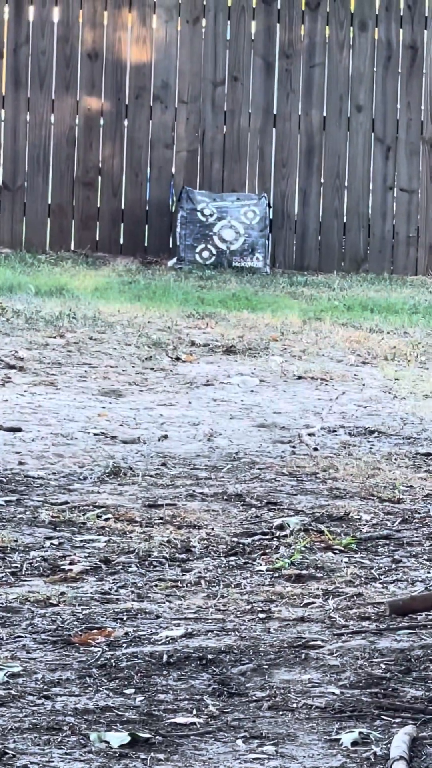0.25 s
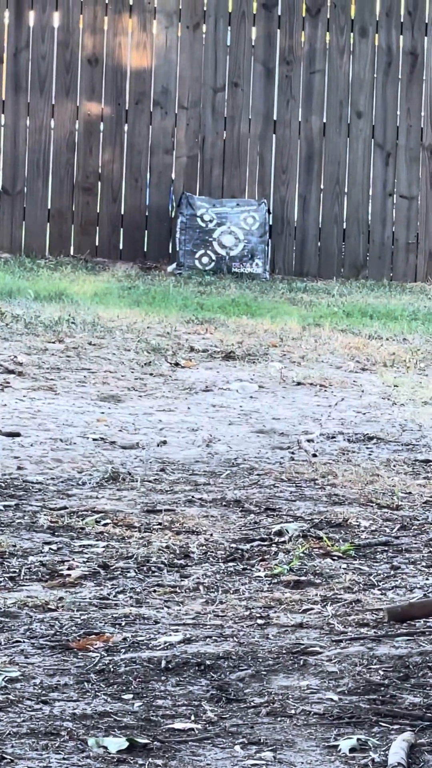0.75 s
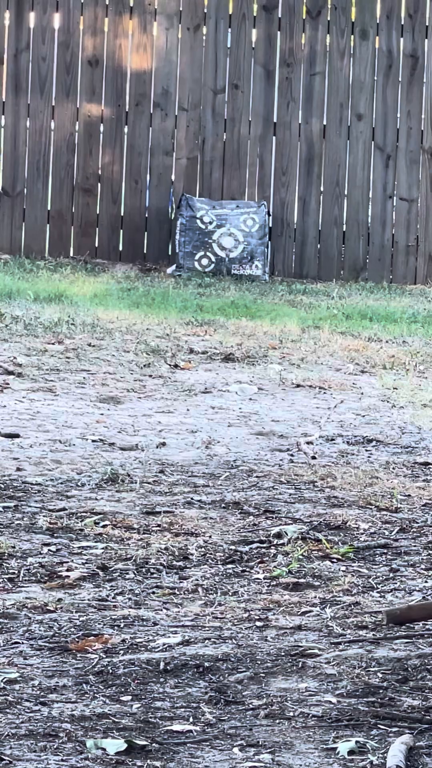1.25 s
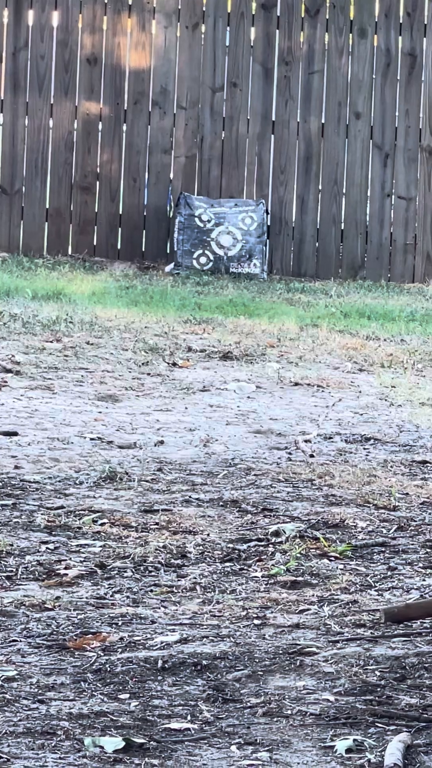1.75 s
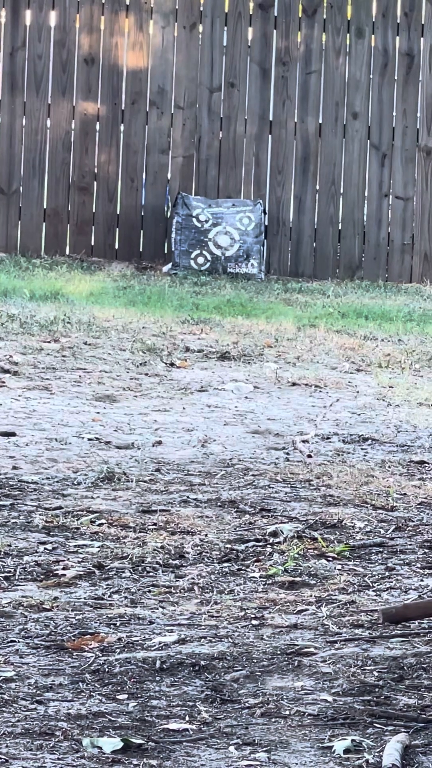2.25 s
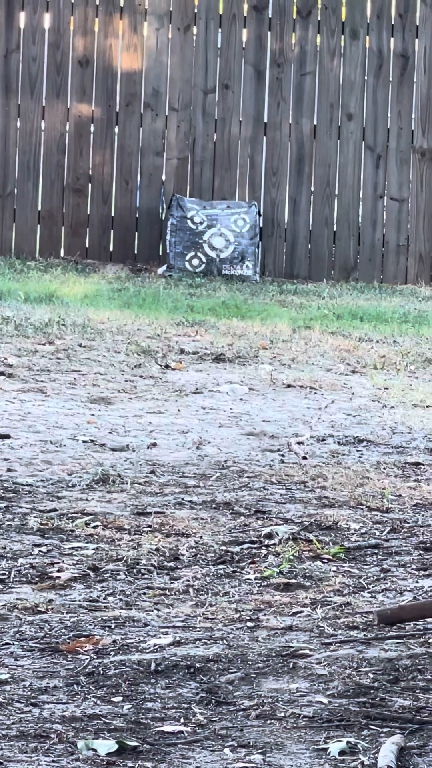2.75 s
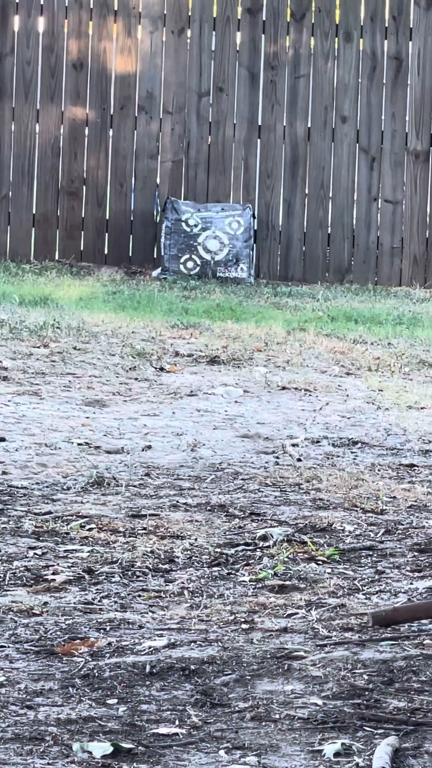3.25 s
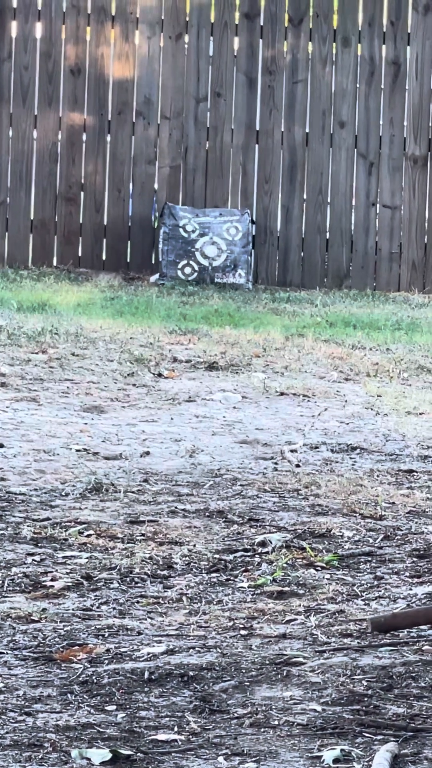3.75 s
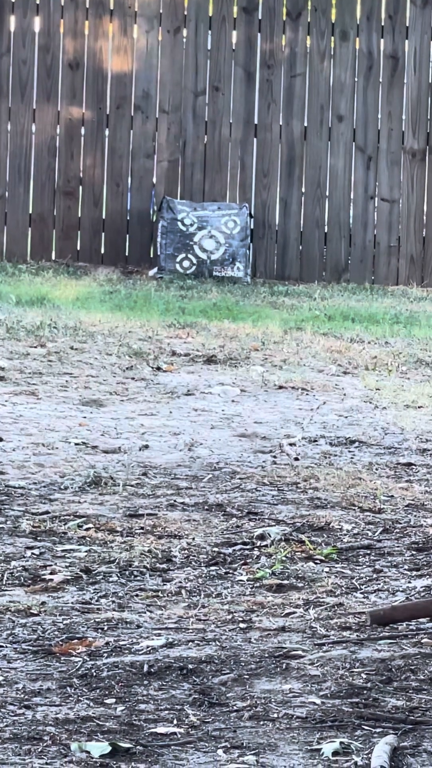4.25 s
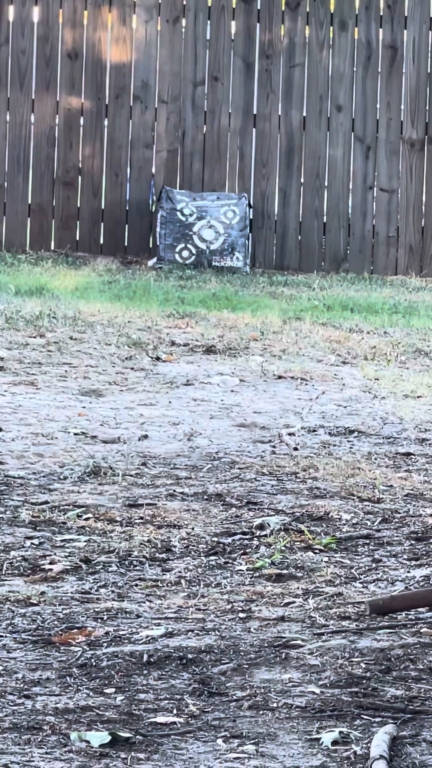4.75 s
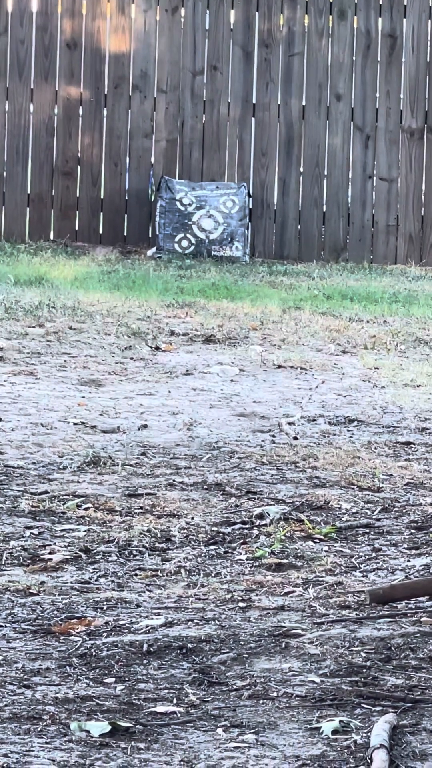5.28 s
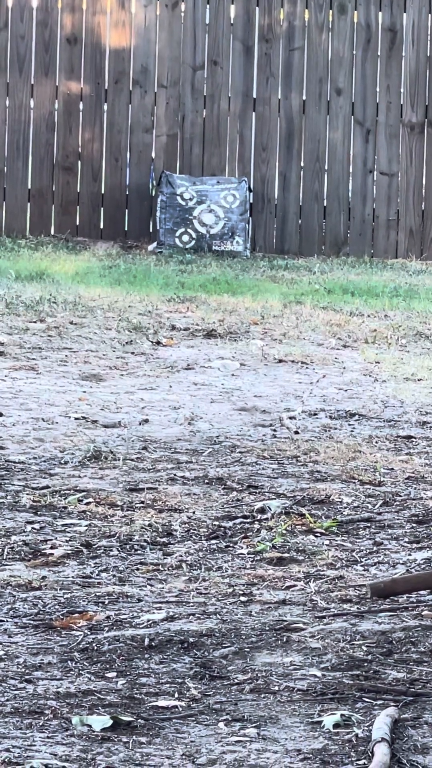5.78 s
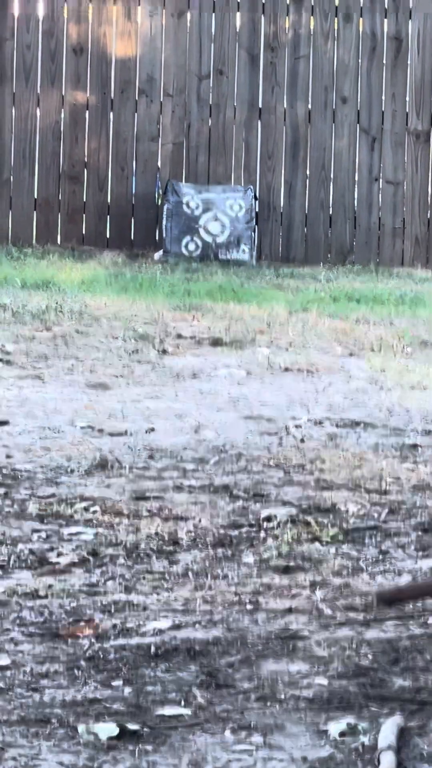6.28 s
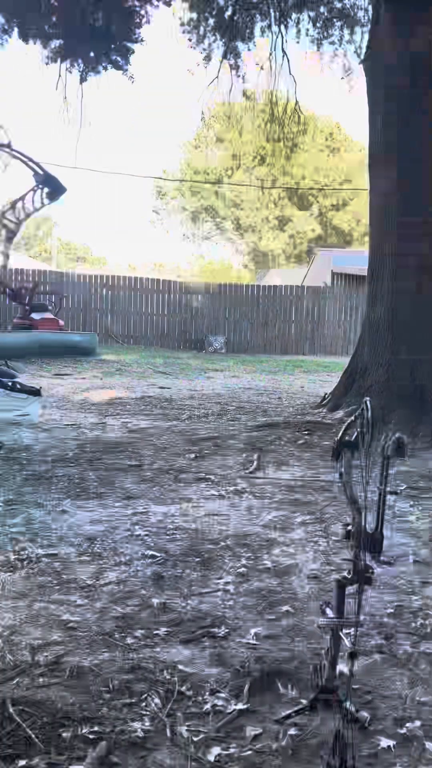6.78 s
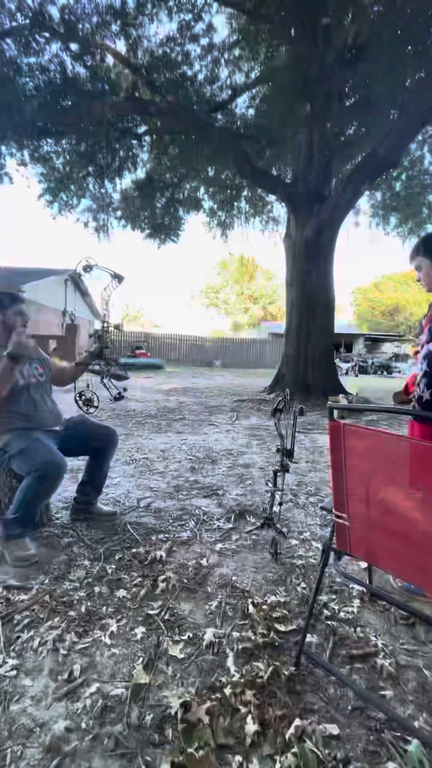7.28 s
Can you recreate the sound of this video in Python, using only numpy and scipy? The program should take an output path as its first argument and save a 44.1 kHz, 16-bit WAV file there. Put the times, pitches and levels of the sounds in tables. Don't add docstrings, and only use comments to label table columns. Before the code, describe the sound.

A stereo phone take in a fenced yard. From the start a lumpy, uneven engine idles nearby, a low throbbing rumble wavering in strength, over soft, dull road hiss. Feet shuffle dry leaves between about 0.7 and 1.7 seconds, with bright tiny snaps near 1.3, and again around 2.4. At 3.3 a bow is shot: a hard metallic release click, a double string slap with short rattles, and a quickly dying limb ring. At 3.57 the arrow hits with a sharp click and a dull, stuffed thump, leaving faint fence echoes. Around 4.6 the engine revs up, holds until nearly 5.8, then drops and fades away. Leaves crackle near 5.1 and 5.6. Close fingertip taps come at 5.9 and 6.25, then 6.55 to 6.96, hardest at 6.73. A faint cricket trills at 6.4 to 6.7. At 7.1 a soft low rush of air marks the phone swinging, with leaves rustling to the end at 7.5.

```python
import sys
import numpy as np
from scipy import signal
from scipy.fft import rfft, irfft, next_fast_len
from scipy.io import wavfile
from scipy.ndimage import uniform_filter1d

SR = 44100
rng = np.random.default_rng(int(sys.argv[2]) if len(sys.argv) > 2 else 0)


def how_loud(loudness_db):
    steps = np.asarray(loudness_db, float) / 20
    return 10 ** steps


def transcribe(u):
    v = np.clip(np.atleast_2d(u).T, -1, 1)
    q = np.round(v * 32767).astype(np.int16)
    wavfile.write(sys.argv[1], SR, q)


N = 331798
T = np.arange(N) / SR


def curve(table):
    s, *columns = np.transpose(table)
    return [np.interp(T, s, c) for c in columns]


def lookup(hz, table):
    f, v = np.transpose(table)
    return np.interp(np.log(np.maximum(hz, 1)), np.log(f), v)


def colour(x, table, tilt_db=0.):
    size = next_fast_len(len(x))
    hz = np.arange(size // 2 + 1) * SR / size
    gain = how_loud(lookup(hz, table) + tilt_db * np.log2(np.maximum(hz, 20) / 3000))
    gain /= np.sqrt(np.mean(gain ** 2))
    return irfft(rfft(x, size) * gain, size)[:len(x)]


def walk(rate):
    place = T * rate
    levels = rng.standard_normal(int(place[-1]) + 2)
    k = place.astype(int)
    part = place - k
    share = part ** 2 * (3 - 2 * part)
    return 1.2 * (levels[k] + share * (levels[k + 1] - levels[k]))


def add(out, s, piece):
    i = int(s * SR)
    out[i:i + len(piece)] += piece[:len(out) - i]


def ring(modes, db, push_s):
    t = T[:SR // 2]
    tones = sum(how_loud(g) * np.sin(2 * np.pi * f * t) * how_loud(-60 * t / t60) for f, g, t60 in modes)
    return how_loud(db) * (1 - np.exp(-t / push_s)) * tones


def engine():
    # (time [s], cycle rate [Hz])
    speed = [(0, 9.58), (1.2, 10.16), (1.95, 10.0), (2.65, 9.24), (3.25, 9.72), (4.5, 9.5), (4.64, 11.5),
             (4.8, 15.4), (5.02, 17), (5.3, 17.08), (5.78, 16.35), (6.06, 14.4), (6.32, 13.5), (6.46, 12.3),
             (6.9, 12.6), (7.52, 11.2)]
    # (time [s], level of the even firing [dB], lope of the uneven banks re that [dB])
    effort = [(0, -28, -19), (.45, -42, 10.5), (.8, -31.5, -0.5), (1.3, -25.5, 1.5), (1.9, -28.5, -2),
              (2.4, -35.5, 1.5), (2.6, -27, -13), (3.3, -34.5, -4), (3.6, -39, 3.5), (4.5, -41, -2),
              (4.66, -41, 0), (4.82, -20.5, -18), (5.78, -19.5, -25), (6.0, -27.5, -12), (6.36, -26.5, -12),
              (6.45, -34, -9.5), (7.52, -67.5, -2)]
    # (frequency [Hz], level [dB])
    exhaust = [(20, -31), (35, -19.5), (50, -7.5), (70, -1), (110, 4), (150, -5), (180, -10.5), (240, -13),
               (320, -33), (450, -76)]
    # (multiple of the cycle rate [1], level [dB])
    idle_orders = [(1, -54), (2, -47), (3, -33), (4, -24.5), (5, -11), (6, -28.5), (7, -12), (8, -2),
                   (9, -18.5), (10, 0), (11, -20.5), (12, -14.5), (13, -16.5), (14, -17), (15, -16),
                   (16, -25), (17, -34.5)]
    # (multiple of the cycle rate [1], level [dB])
    rev_orders = [(1, -49), (2, -38.5), (3, -15), (4, -30.5), (5, -14), (6, -26), (7, -20.5), (8, 0),
                  (9, -16.5), (10, -21), (11, -37.5), (12, -31.5), (13, -27), (14, -35.5), (15, -38),
                  (16, -33.5), (17, -38)]
    idle_hz, full_hz = 10, 16.5
    leaves_at_s, recede_db_per_s = 5.6, 8

    hz, even_db, lope_db = (uniform_filter1d(c, SR // 16) for c in curve(speed) + curve(effort))
    turn = 2 * np.pi * np.cumsum(hz) / SR
    revs = np.clip((hz - idle_hz) / (full_hz - idle_hz), 0, 1)
    calm = 1 - revs

    load_db = -40 + 3.5 * np.sqrt(revs) + 0.1 * calm * (even_db + lope_db + 38.5)
    load_db += 0.31 * np.clip(np.gradient(hz) * SR, 0, 20)
    load_db -= recede_db_per_s * np.maximum(T - leaves_at_s, 0)

    overtone_db = even_db - 17 - 0.6 * lope_db - 31.5 * revs
    strong_db = {5: load_db, 8: even_db, 10: even_db + lope_db, 16: overtone_db}

    rumble_db = load_db - 9 + 1.5 * revs + 13 + 0.73 * walk(6.1)
    out = how_loud(rumble_db) * colour(rng.standard_normal(N), exhaust)
    for (k, idle_db), (_, rev_db) in zip(idle_orders, rev_orders):
        if k in strong_db:
            db = strong_db[k] + 1.5 * calm * walk(7)
        else:
            db = load_db - 1.5 + 11 + idle_db + revs * (rev_db - idle_db) + 3 * calm * walk(4)
        phase = k * turn + .25 * calm * walk(5) + 2 * np.pi * rng.random()
        out += np.sqrt(2) * how_loud(db) * np.sin(phase)
    return out


def road():
    # (time [s], level [dB], brightness [dB])
    traffic = [(0, -47.5, -1), (.73, -49.5, 0.5), (1.53, -48.5, 0.5), (3.83, -54, 1.5), (4.9, -52, 1),
               (7.52, -55, -3)]
    # (frequency [Hz], level [dB])
    centre_colour = [(150, -16), (330, -1), (560, -2), (850, 1), (1300, -7.5), (1800, -8.5), (2550, -13.5),
                     (2900, -18.5), (4500, -24.5), (6400, -29), (8900, -36), (10600, -45), (12100, -52.5),
                     (12500, -65.5), (16000, -86.5)]
    # (frequency [Hz], level [dB])
    wide_colour = [(35, 8.5), (130, 8.5), (220, -11.5), (500, -6.5), (900, 0), (1300, -3), (1800, -20.5),
                   (3000, -29.5), (5000, -57.5), (13000, -87.5)]
    db, treble_db = curve(traffic)
    hiss = colour(rng.standard_normal(N), centre_colour)
    dull = signal.sosfilt(signal.butter(2, 1800, fs=SR, output="sos"), hiss)
    bright = hiss - dull
    centre = dull * how_loud(0.73 * walk(6)) + bright * how_loud(treble_db + 1.1 * walk(9))
    wide = np.array([colour(rng.standard_normal(N), wide_colour) for _ in range(2)])
    return centre * how_loud(db + 0.5), wide * how_loud(db - 0.5)


def leaves():
    # (time at full level [s], level [dB], hold [s], low share [dB], crackle depth [dB])
    shuffles = [(.68, -59.5, 0.02, 4.5, 1), (.85, -68.5, 0.018, 14, 2), (0.937, -65, 0.041, -5, 2.5),
                (1.144, -65, 0.053, -16, 3), (1.31, -64, 0.14, -9, 3.5), (1.52, -72, .01, 1, -1),
                (1.706, -68.5, 0.024, 9.5, -0.5), (2.146, -70.5, 0.0071, 5.5, 3),
                (2.421, -55, 0.047, 3, 1.9), (4.972, -72, 0.018, 0.5, 1), (5.098, -50.5, .02, 6, 1.5),
                (5.542, -60.5, 0.067, 4, 1.5), (5.72, -56.5, 0.053, 4.5, 1.5), (5.874, -81.5, .03, 0, 3),
                (6.026, -78.5, 0.011, 3.5, 3), (6.369, -80.5, 0.32, 13.5, 2.5), (7.164, -58, .2, 1, 1),
                (7.41, -74.5, 0.084, 6, 2)]
    # (frequency [Hz], level [dB])
    leaf_colour = [(800, -25), (2000, -6), (3500, -9.5), (6500, -6), (8500, 0), (10600, 5), (12000, -15),
                   (14000, -26), (16000, -47)]
    # (time [s], peak level [dB], centre frequency [Hz])
    snaps = [(1.126, -35, 10500), (1.2972, -26.5, 10600), (1.3338, -25, 11000), (1.3728, -28, 10400),
             (1.388, -28, 10800), (1.4014, -30, 11000), (1.4205, -27.5, 11400), (2.41, -32, 10700),
             (2.4743, -25, 10670), (2.5557, -30.5, 8200), (4.2407, -47, 6040), (5.0843, -31, 11000),
             (5.1267, -46, 3440), (5.6345, -34, 11080), (5.7018, -40, 3110), (5.8907, -28.5, 2830),
             (6.0335, -43, 10500)]
    rise_db_per_s, fall_db_per_s = 249.5, 307
    settle_db, settle_db_per_s, stir_db = -14.5, 63.5, -89

    s, db, hold, low_db, grain_db = np.transpose(shuffles)[:, :, None]
    t = T[::64]
    late = np.maximum(t - s - hold, 0)
    rise = how_loud(db - rise_db_per_s * np.maximum(s - t, 0))
    fall = np.maximum(how_loud(-fall_db_per_s * late), how_loud(settle_db - settle_db_per_s * late))
    gains = rise * fall
    gain = gains.sum(axis=0) + how_loud(stir_db)
    low_db = (gains * low_db).sum(axis=0) / gain
    grain_db = (gains * grain_db).sum(axis=0) / gain
    gain, low_db, grain_db = (np.interp(T, t, c) for c in (gain, low_db, grain_db))

    grain = how_loud(grain_db * (1.3 * walk(300) + .6 * walk(40)))
    crackle = colour(rng.standard_normal(N) * grain, leaf_colour)
    low = signal.sosfilt(signal.butter(2, 5000, fs=SR, output="sos"), crackle)
    out = (crackle - low + low * how_loud(low_db)) * gain * how_loud(8)

    t = T[:400]
    shape = np.exp(-t / 0.0016) * np.minimum(t / 0.0006, 1)
    for s, peak_db, hz in snaps:
        peak = [(hz / 3, -14), (hz, 0), (min(hz * 1.35, 13000), -10), (17000, -40)]
        add(out, s, how_loud(peak_db - 5.0) * colour(rng.standard_normal(400), peak) * shape)
    return out


def bow():
    # (time [s], level [dB], rise [s], t60 [s], tilt [dB per octave])
    rattles = [
        (3.2937, -10, 0.00045, 0.0064, 14.5),
        (3.2949, -31.5, 0.00056, 0.045, 6.5),
        (3.2992, -30.5, .0005, 0.019, 9.5),
        (3.3131, -31, .002, 0.021, 0),
        (3.3163, -14, 0.00025, 0.018, 3),
        (3.3194, -13.5, 0.00017, 0.022, 0),
        (3.324, -19.5, .001, 0.07, -7),
        (3.334, -24, .0007, 0.0097, -5.5),
        (3.3454, -30.5, .001, 0.05005, 9.5),
    ]
    # (frequency [Hz], level [dB])
    shot_colour = [(200, -13.5), (700, 0), (1500, 4), (3000, -0.5), (5000, 0.5), (7500, -1.5), (11000, 2),
                   (13000, -22.5), (15000, -25.5), (16500, -52.5)]
    # (frequency [Hz], level [dB], t60 [s])
    release = [(5884, -8.5, 0.023), (7550, 2, 0.024), (7580, -12.5, 0.0594), (10600, -21, 0.041),
               (11300, -5.5, 0.021)]
    # (frequency [Hz], level [dB], t60 [s])
    limb_modes = [(287, 3.5, 0.078), (370, 1.5, 0.1), (704, -5, 0.15), (1260, -30.5, 0.2),
                  (1674, -26.5, 0.57)]
    out, knocks = np.zeros((2, N))
    t = T[:4096] - .008
    knock = signal.unit_impulse(4096, 353)
    for s, db, rise, t60, tilt_db in rattles:
        shape = how_loud(db) * np.where(t < 0, np.exp(t / rise), how_loud(-60 * np.maximum(t, 0) / t60))
        add(out, s - .008, shape * colour(rng.standard_normal(4096), shot_colour, tilt_db))
        strength = np.sqrt(np.sum(shape ** 2))
        add(knocks, s - .008, strength * colour(knock, shot_colour, tilt_db))
    limbs = ring(limb_modes, db=-25.0, push_s=0.0038)
    add(out, 3.293, ring(release, db=-20.5, push_s=0.00017))
    add(out, 3.318, limbs)
    add(knocks, 3.318, limbs)
    return out, knocks


def yard(x, wet_db, rise_s, echo_db):
    # (frequency [Hz], t60 [s])
    scatter_t60 = [(250, 0.5), (800, 0.33), (2000, 0.67), (5000, 0.44), (10000, 0.52), (14000, 0.15)]
    # (delay [s], level [dB])
    echoes = [
        (0.029, -19.5),
        (0.047, -21),
        (.108, -25),
    ]
    t = T[:SR]
    answer = np.zeros(SR)
    for hz in 180 * 2 ** np.arange(0, 7, .5):
        bell = [(hz / 2, -40), (hz / 1.4, -10), (hz, 0), (hz * 1.4, -10), (hz * 2, -40)]
        band = colour(rng.standard_normal(SR), bell)
        answer += band * np.sqrt(hz / 22000) * how_loud(-60 * t / lookup(hz, scatter_t60))
    answer *= how_loud(wet_db) * np.minimum(t / rise_s, 1)
    for delay, db in echoes:
        smear = rng.standard_normal(300) * np.exp(-T[:300] / 0.0013)
        add(answer, delay, how_loud(db + echo_db) * smear)
    return signal.fftconvolve(x, answer)[:N]


def arrow():
    # (frequency [Hz], level [dB])
    tip_colour = [(300, -5.5), (1200, -13), (2200, -4.5), (3800, -1.5), (6000, -4.5), (8000, -6),
                  (10500, -4), (12000, -26), (14000, -46), (16500, -62)]
    # (frequency [Hz], level [dB], t60 [s])
    bag_modes = [(233, -3, 0.1), (163, -2, 0.068), (278, 3.5, 0.058), (352, 4, 0.055), (606, -5, 0.033)]
    tip = np.zeros(N)
    add(tip, 3.5748, np.ones(1))
    add(tip, 3.5752, 0.04 * rng.standard_normal(400) * how_loud(-60 * T[:400] / 0.016))
    out = colour(tip, tip_colour)
    add(out, 3.575, ring(bag_modes, db=-16.5, push_s=0.0053))
    t = T[:8192]
    stuffing = [(100, -30), (180, -2.5), (450, -2), (900, -21.0), (2000, -50), (8000, -85)]
    filling = colour(rng.standard_normal(8192), stuffing)
    add(out, 3.575, how_loud(-25.0) * filling * how_loud(-60 * t / .09) * np.minimum(t / 0.0028, 1))
    return out


def taps():
    # (time [s], peak level [dB], pitch [Hz], length [s])
    touches = [
        (5.892, -37.5, 710, 0.0012),
        (6.251, -35, 510, 0.00079),
        (6.26, -28, 500, 0.00083),
        (6.56, -29.5, 517, 0.00091),
        (6.609, -43, 547, .00083),
        (6.626, -38.5, 650, 0.0005),
        (6.685, -44.5, 525, .0009),
        (6.727, -21.5, 530, 0.00097),
        (6.942, -36.5, 435, 0.00068),
        (6.959, -29, 480, 0.00083),
    ]
    out = np.zeros(N)
    t = T[:800] - .006
    for s, db, hz, length in touches:
        cycles = 0.78 * hz * (t - 0.00234 * np.exp(-(t + 0.0032) / 0.0014))
        spread = np.where(t < 0, 1.76 * length, length)
        shape = np.exp(-(t / spread) ** 2 / 2)
        add(out, s - .003, how_loud(db + 4.5) * shape * np.cos(2 * np.pi * cycles))
    return out


def cricket():
    start_s, length_s, peak_s = 6.385, .33, .05
    pitch_hz, sag_hz, strokes_per_s, stroke_depth_db = 3290, 240, 45, 19
    t = T - start_s
    share = np.clip(t / length_s, 0, 1)
    strokes = np.cumsum(strokes_per_s * (1 + .25 * walk(25))) / SR % 1
    swell_db = -53.5 - 6.5 * np.minimum(np.abs(t - peak_s) / 0.11, 1)
    db = swell_db - stroke_depth_db * strokes + 2.0 * walk(60) - 6.5 * share ** 2
    gain = uniform_filter1d(how_loud(db) * (share > 0) * (share < 1), 90)
    return gain * np.sin(2 * np.pi * np.cumsum(pitch_hz - sag_hz * share) / SR)


def swing():
    # (frequency [Hz], level [dB])
    air_colour = [(30, -9), (90, 0), (250, -7.5), (900, -18), (2500, -23), (6000, -55)]
    start_s, level_db, rise_s, fade_s = 7.115, -41.5, 0.022, 0.12
    t = np.maximum(T - start_s, 0)
    shape = how_loud(level_db + 1.5 * walk(25)) * np.minimum(t / rise_s, 1) * np.exp(-t / fade_s)
    both, own = (colour(rng.standard_normal(N), air_colour) for _ in range(2))
    return shape * (both + 0.23 * own * np.array([[1], [-1]]))


def ports(x, table):
    hz, lead = np.transpose(table)
    size = next_fast_len(len(x))
    turn = np.exp(.5j * np.interp(np.arange(size // 2 + 1) * SR / size, hz, lead))
    return irfft(rfft(x, size) * np.array([turn, turn.conj()]), size)[:, :len(x)]


def phone_hears(outside):
    # (frequency [Hz], lead of the left port [rad])
    lead_before = [(0, 0), (300, -0.06), (1290, -0.63), (1700, 0.04), (2700, 0.71), (4100, 0.76),
                   (4600, 1.86), (5150, 4.95), (5700, 6.09), (6300, 6.68), (8500, 8.99), (9600, 9.72),
                   (11800, 12.43), (13800, 13.1)]
    # (frequency [Hz], lead of the left port [rad])
    lead_after = [(0, 0), (5000, 0), (7300, 2.3), (9500, 3.1), (11900, 6), (13200, 6.3)]
    turn_s, turn_length_s, spread_db = 7.06, .03, -5.5
    sound, last = ports(outside, lead_before), outside[-SR:]
    spread = how_loud(spread_db) * np.roll(last, SR // 50) * np.array([[1], [-1]])
    turned = ports(last, lead_after) + spread
    share = np.clip((T[-SR:] - turn_s) / turn_length_s, 0, 1)
    sound[:, -SR:] += share * (turned - sound[:, -SR:])
    return sound


def scene():
    hiss, wide = road()
    slap, knocks = bow()
    hit = arrow()
    shot = slap + yard(knocks, wet_db=-47.0, rise_s=0.011, echo_db=-19)
    shot += hit + yard(hit, wet_db=-47, rise_s=0.007, echo_db=-22)
    outside = engine() + hiss + leaves() + shot + cricket()
    fade_in = np.minimum(T / .004, 1)
    return (phone_hears(outside) + wide + taps() + swing()) * fade_in


def band_limit(x):
    return signal.sosfilt(signal.butter(12, 16820, fs=SR, output="sos"), x)


def record(dry):
    # (frequency [Hz], level per bin [dB])
    gate = [(3000, -140), (5000, -117), (9000, -110), (10500, -115), (12000, -110), (12400, -100),
            (16000, -93)]
    width, top = 12, 504
    mid_side = np.array([dry[0] + dry[1], dry[0] - dry[1]]) / 2
    hz, _, bins = signal.stft(mid_side, SR, nperseg=1024)
    power = np.abs(bins[:, :top]) ** 2
    bands = power.reshape(2, -1, width, bins.shape[2]).mean(axis=2).repeat(width, axis=1)
    bins[:, :top] *= bands > how_loud(2 * lookup(hz[:top], gate) + 6)[:, None]
    bins[:, top:] = 0
    mid, side = signal.istft(bins, SR, nperseg=1024)[1][:, :N]
    return band_limit(np.array([mid + side, mid - side]))


dry = scene()
out = record(dry)
transcribe(out)
```